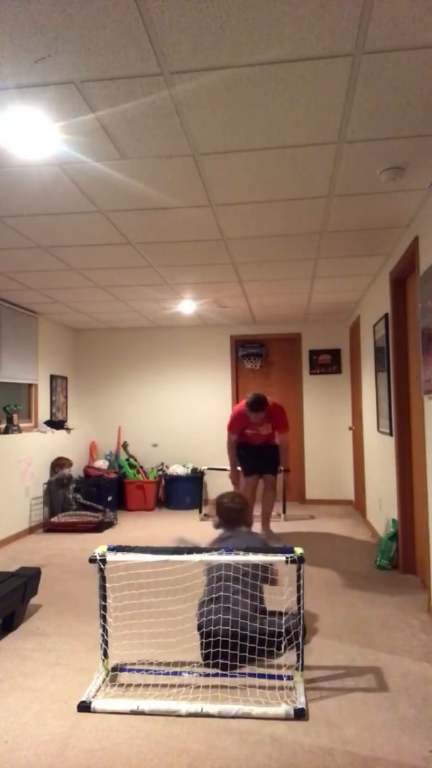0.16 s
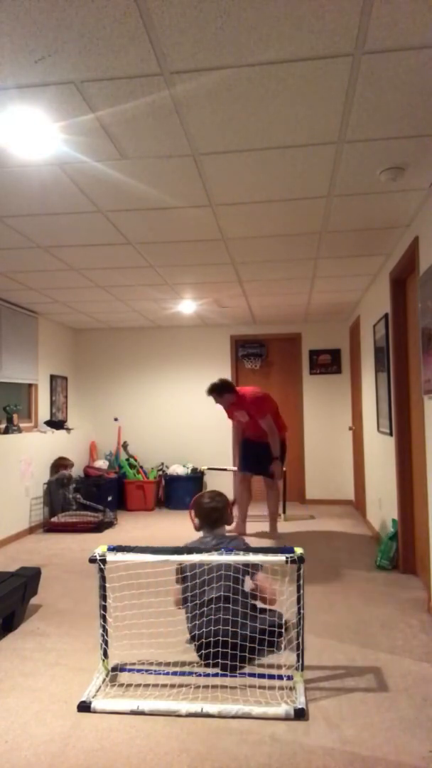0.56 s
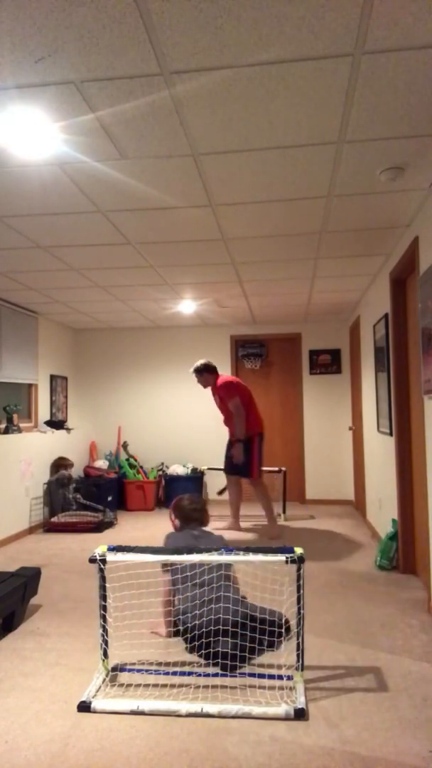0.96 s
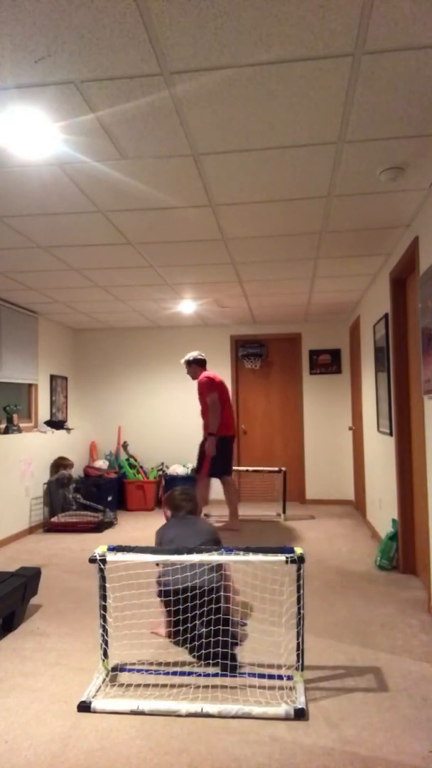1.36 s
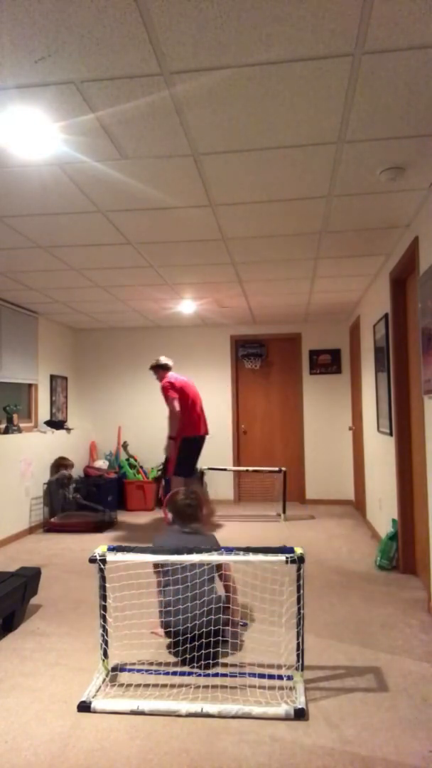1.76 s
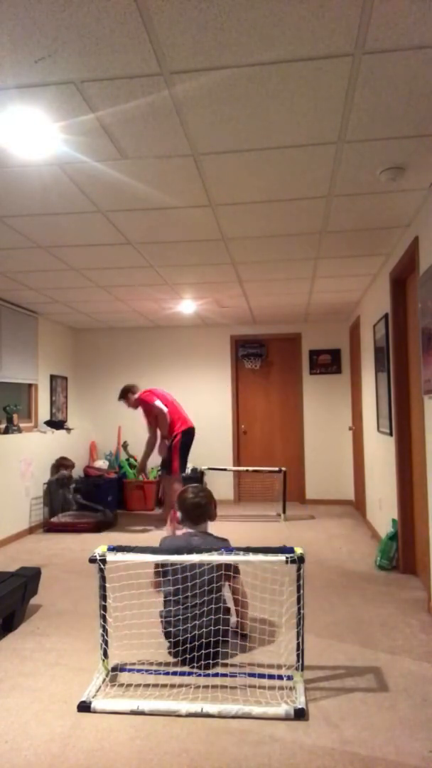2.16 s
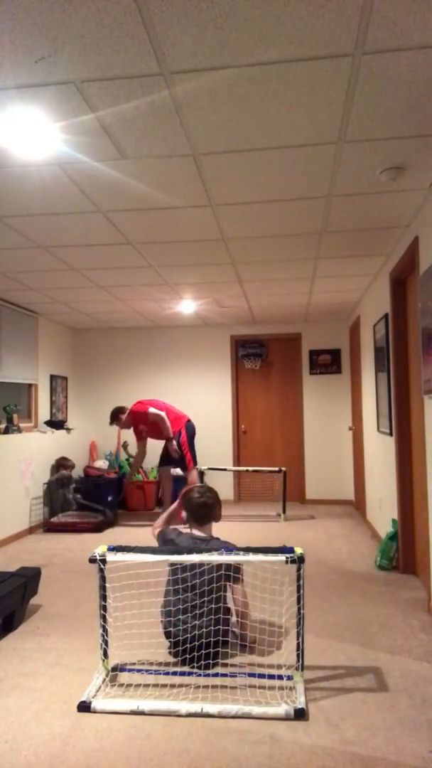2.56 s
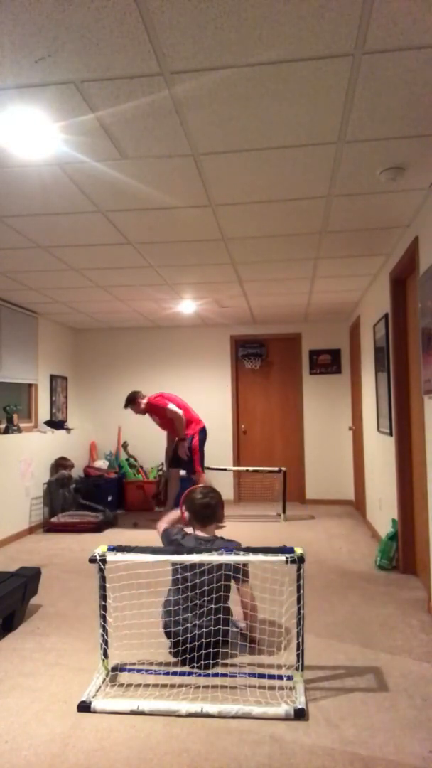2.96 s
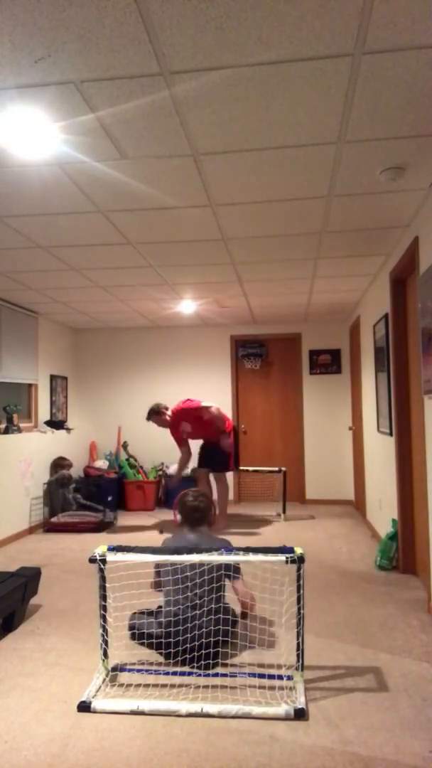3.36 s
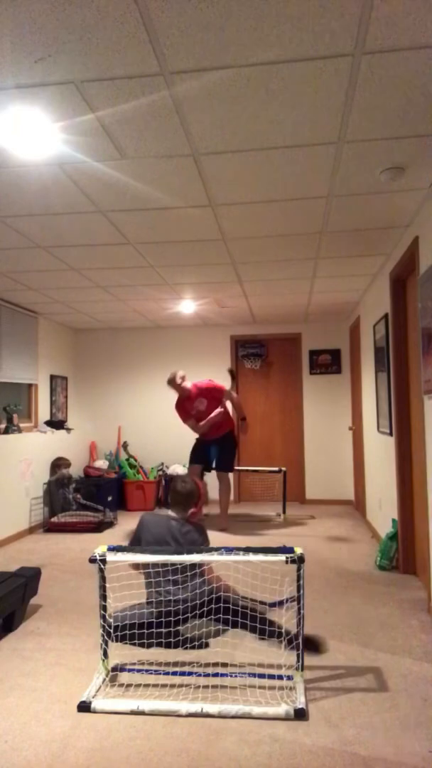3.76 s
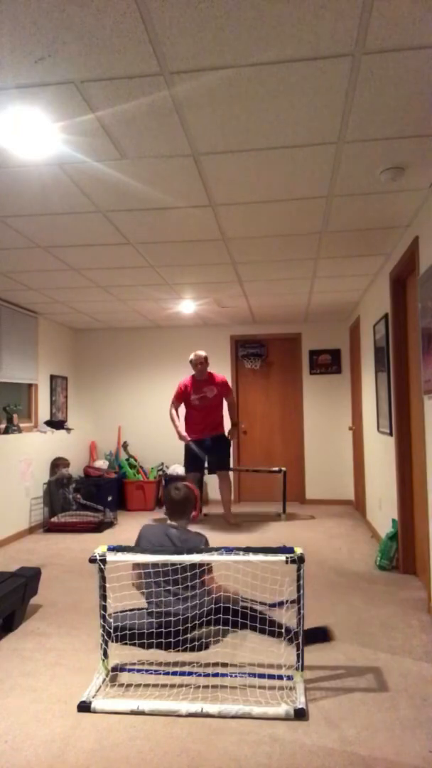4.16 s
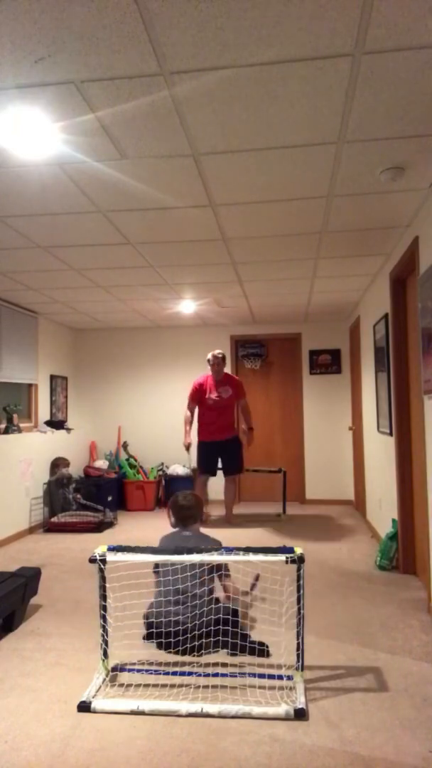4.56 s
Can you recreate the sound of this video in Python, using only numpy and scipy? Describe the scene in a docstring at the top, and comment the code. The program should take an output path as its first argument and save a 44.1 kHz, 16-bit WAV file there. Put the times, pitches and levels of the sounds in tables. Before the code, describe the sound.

Over a low furnace hum, a small knock, a dull knee thud, then a loud burst of plastic clacks and scuffing on carpet.

```python
"""A furnace hums low in a long carpeted basement room, from wavering tones, rumble and narrow duct noise.
Over a shifting background of rustle and hiss, legs in cloth slide on the carpet: noise that swells and fades.
Short plastic sticks and a ball knock on each other and on the floor, and a knee thuds down: a noise crack
over struck modes. Loose metal bits rattle once as high ringing ticks. Faint hiss lies under it all."""
import sys
import numpy as np
from scipy import signal
from scipy.fft import rfft, irfft
from scipy.io import wavfile
from scipy.ndimage import uniform_filter1d

SR = 44100
rng = np.random.default_rng(int(sys.argv[2]) if len(sys.argv) > 2 else 0)


def ratio(d):
    """dB to gain"""
    e = np.asarray(d, float) / 20
    return 10 ** e


def dump_mix(stems):
    """Bounce the given channels to the path in sys.argv[1] as a 16-bit WAV at rate SR."""
    frames = np.atleast_2d(stems).T  # one column per channel
    limited = np.clip(frames, -1, 1)  # hard clip at full scale
    pcm = np.round(limited * 32767).astype(np.int16)
    wavfile.write(sys.argv[1], SR, pcm)


N = 207314
TIME = np.arange(N) / SR  # s


def unit(x):
    """Scale to rms 1."""
    return x / np.sqrt(np.mean(x ** 2))


def coloured(x, points):
    """Shape the spectrum by (Hz, dB) points joined on a log frequency axis."""
    hz, db = np.transpose(points)
    f = np.maximum(np.arange(len(x) // 2 + 1) * SR / len(x), 1)
    gain_db = np.interp(np.log(f), np.log(hz), db, left=-90, right=-90)
    return irfft(rfft(x) * ratio(gain_db), len(x))


def noise(points):
    """Steady noise of a given colour, rms 1."""
    return unit(coloured(rng.standard_normal(N), points))


def walk(rate):
    """Random levels held 1 / rate seconds and smoothed twice; spread near 1."""
    hold = int(SR / rate)
    steps = np.repeat(rng.standard_normal(N // hold + 1), hold)
    return 1.02 * uniform_filter1d(uniform_filter1d(steps, hold), hold)[:N]


def curves(table):
    """Each column after the first as a line over time; the first holds the seconds."""
    s, *columns = np.transpose(table)
    return [np.interp(TIME, s, c) for c in columns]


def add(out, s, x):
    """Mix a sound in at a time in seconds."""
    i = int(s * SR)
    out[i:i + len(x)] += x[:N - i]


def ring(modes, t, lean_db, contact_s):
    """Struck modes of alternating sign that decay, and swell in over the contact time; peak 1."""
    hz, db, t60 = np.transpose(modes)[:, :, None]
    sign = (-1.) ** np.arange(len(modes))[:, None]
    partials = sign * ratio(db + lean_db) * np.sin(2 * np.pi * hz * t) * ratio(-60 * t / t60)
    y = np.sum(partials, axis=0) * (1 - np.exp(-t / contact_s)) ** 2
    return y / np.abs(y).max()


def room(x):
    """Direct sound plus a diffuse tail, new at each call, that builds up and dies band by band."""
    # Reverb bands. Each row: centre in Hz, relative level in dB, decay by 60 dB in seconds.
    reverb_bands = [(124, -5, 0.5), (300, 4.5, 0.42), (633, 0.5, 0.29), (1480, 5.5, 0.19),
                    (3480, 4.5, 0.25), (7100, -0.5, 0.28), (12600, 6, 0.16)]
    gap_s, build_s = 0.00085, 0.0006
    t = np.arange(SR // 2) / SR
    tail = 0
    for hz, db, t60 in reverb_bands:
        shape = [(hz / 2.2, -30), (hz / 1.5, -3), (hz * 1.5, -3), (hz * 2.2, -30)]
        band = coloured(rng.standard_normal(len(t)), shape)
        tail = tail + band * ratio(db - 60 * t / t60) / np.sqrt(t60 * SR)
    # the near walls and low ceiling answer first and strongest
    tail = tail * (1 + ratio(5.5) * np.exp(-t / 0.0021))
    tail = ratio(10.5) * tail * (1 - np.exp(-np.maximum(t - gap_s, 0) / build_s))
    tail[0] = 1  # direct sound
    return signal.fftconvolve(x, tail)


def hiss():
    """Faint steady hiss: coloured noise."""
    # Colour of the hiss. Each row: frequency in Hz, relative level in dB per Hz.
    hiss_colour = [(880, -31), (1500, 1.5), (1700, -8), (2580, 0), (2820, -11), (3200, -9), (4180, -6.5),
                   (7260, -14.5), (8490, -9.5), (13600, -11.5), (15800, -12)]
    return ratio(-75) * noise(hiss_colour)


def furnace():
    """A wavering blower hum with a mains line, over rumble that swells in a few duct resonances."""
    # Level of the low hum and rumble over time. Each row: time in seconds, level in dB.
    low_level = [(0, -48), (1.3, -47.5), (2.25, -48.5), (2.45, -50.5), (3.9, -50.5), (4.4, -50),
                 (4.7, -47.5)]
    # Colour of the rumble. Each row: frequency in Hz, relative level in dB per Hz.
    rumble_colour = [(15, -59), (25, -27), (29, -26), (36, -1.5), (59, -0.5), (81, -4), (124, -14),
                     (147, -13), (212, -6), (331, -15.5), (612, -26.5), (802, -35), (1130, -36),
                     (1300, -46), (2500, -48), (3250, -74), (5500, -120)]
    # Duct resonances. Each row: centre in Hz, width in Hz, relative level in dB.
    resonances = [(87.5, 11, -2.5), (208.5, 30, 2.5), (587, 78, -16), (1110, 8.3, -21)]

    level_db, = curves(low_level)
    hum_hz = 55.5 * (1 + 0.014 * walk(6.25))
    hum_db = -1 - 0.5 * walk(4.92) + walk(15)
    hum = ratio(hum_db) * np.sin(2 * np.pi * np.cumsum(hum_hz) / SR)
    mains = ratio(-10.5 + 1.2 * walk(4.34)) * np.sin(2 * np.pi * 119.2 * TIME)

    ducts = 0
    for f, w, db in resonances:
        peak = [(f - 2 * w, -30), (f - w / 2, -3), (f, 0), (f + w / 2, -3), (f + 2 * w, -30)]
        ducts = ducts + ratio(db) * noise(peak)
    # thin the rumble out below the hum
    tilt = [(25, -28), (44, 0), (56, 3), (70, 2), (2500, 2.5)]
    broad = unit(coloured(noise(rumble_colour), tilt)) * ratio(0.8 * walk(12))
    rumble = ratio(-2.5) * broad + ratio(-8.5) * ducts
    return ratio(level_db) * (np.sqrt(2) * (hum + mains) + rumble)


def slides():
    """Cloth dragged over pile: a dull drag and the hiss of many fibres letting go, unevenly."""
    # Background rustle and hiss, its level changing over time. Each row: time in seconds, then the levels of
    # the drag, fibre and sizzle layers in dB.
    background = [(0, -71.5, -74, -77.5), (1.4, -70.5, -70, -78), (1.6, -72, -75.5, -80),
                  (2.35, -70.5, -73.5, -79), (2.5, -69.5, -74, -88.5), (4, -68.5, -75, -82.5),
                  (4.7, -68, -68, -69.5)]
    # Slides on carpet. Each row: peak time, rise and fall in seconds, drag level in dB, brightness in dB.
    strokes = [(.307, 0.0037, 0.032, -53.5, 3), (.5, 0.073, 0.066, -68.5, -3),
               (1.2, 0.15, 0.18, -67.5, -0.5), (1.42, 0.098, .07, -66, 2), (1.95, 0.13, .05, -71, 2),
               (2.32, 0.089, 0.17, -69, 0), (3.141, 0.037, 0.055, -62, 2), (3.29, 0.035, 0.041, -57.5, 1),
               (3.45, 0.046, 0.16, -53.5, -1.5), (3.72, .12, 0.099, -56, -2), (4.21, 0.074, 0.094, -57, -2),
               (4.4, 0.025, 0.052, -70, -2), (4.535, 0.012, 0.068, -69, 9)]
    # Colours of the three layers. Each row: frequency in Hz, relative level in dB per Hz.
    drag_colour = [(600, -10), (900, -1), (1150, 3), (1400, -0.5), (1700, -0.5), (2300, -5), (2800, -12),
                   (3600, -31)]
    fibre_colour = [(1650, -64), (2800, -2.5), (3390, -2.5), (4870, -6.5), (5660, -3), (6810, -4),
                    (10000, -19), (13000, -61), (22000, -120)]
    sizzle_colour = [(4710, -42), (8000, 0), (10400, -5), (12400, 1), (14900, -9.5), (15800, -4)]

    power = ratio(np.array(curves(background))) ** 2
    for s, rise_s, fall_s, drag_db, bright_db in strokes:
        swell = np.exp(-((TIME - s) / np.where(TIME < s, rise_s, fall_s)) ** 2)
        # a brighter slide lifts the sizzle twice as much as the fibres
        layers_db = drag_db + np.array([0, -5.5 + bright_db, -15.5 + 2 * bright_db])
        power = power + ratio(layers_db)[:, None] ** 2 * swell
    drag, fibre, sizzle = np.sqrt(power)
    catch = walk(25.38)  # unevenness shared by all three layers
    drag = drag * ratio(1.56 * catch) * noise(drag_colour)
    fibre = fibre * ratio(0.44 * catch + 0.73 * walk(68)) * noise(fibre_colour)
    sizzle = sizzle * ratio(catch) * noise(sizzle_colour)
    return drag + fibre + sizzle


def rattle():
    """Loose metal bits chafe and tick against each other for a moment and ring high."""
    # Ringing of the bits. Each row: frequency in Hz, relative level in dB, decay by 60 dB in seconds.
    metal_modes = [(6840, -1, .06), (8100, -3, .06), (8640, 1, .06), (9800, -15, 0.052), (11000, -9, .06),
                   (11700, 6, 0.053), (12240, 1, 0.055), (13700, -4, .06)]
    # Colour of the chafing. Each row: frequency in Hz, relative level in dB per Hz.
    chafe_colour = [(880, -32), (1500, -2.5), (3330, -6.5), (3860, -7), (4350, -9), (6450, 2), (12200, -6),
                    (15800, -9)]
    start_s, length_s = 0.98, 0.04

    t = np.arange(SR // 8) / SR
    swell = np.exp(-TIME / length_s) * (1 - np.exp(-TIME / 0.00043))
    out = ratio(-51.5) * noise(chafe_colour) * swell
    for when, size, detune, *spot in rng.random((24, 3 + len(metal_modes))):
        stretched = t * (1 + 0.035 * (detune - 0.5))
        spot_db = -24 * np.array(spot)[:, None]  # each tick brings out other modes
        tick = ring(metal_modes, stretched, spot_db, 0.00023)
        add(out, length_s * when ** 1.2, ratio(-56 - 5.6 * size) * tick)
    return np.roll(room(out)[:N], int(start_s * SR))


def blows():
    """Every blow cracks, rings the stick, knocks hollow and thumps the floor; clacks are hard, thuds soft."""
    # Hard contacts of stick and ball, bounces included. Each row: start in seconds, crack, stick ring and
    # hollow knock in dB, pitch the knock leans to in Hz.
    clacks = [(.3035, -33.5, -37, -39, 570), (.3085, -31.5, -42.5, -31.5, 580),
              (0.3186, -35.5, -56, -24.5, 556), (.9720, -40.5, -47.5, -34.5, 487),
              (3.4246, -45, -35, -54, 636), (3.4320, -19.5, -14.5, -18.5, 640),
              (3.4346, -10.5, -18.5, -23, 650), (3.4420, -20, -24, -21.5, 660),
              (3.4480, -33, -25, -23, 353), (3.5428, -30, -18.5, -33, 300),
              (3.5480, -25.5, -29, -30.5, 627), (3.5586, -44, -39, -34, 650),
              (3.5680, -31, -40, -30.5, 666), (3.609, -55, -61, -42, 620), (4.0, -53, -62, -68, 600),
              (4.4430, -54, -47, -36, 534), (4.5200, -45, -58, -56, 300)]
    # Soft falls of knee, foot and ball on the carpet. Each row: start in seconds, hollow knock and floor
    # thump in dB, pitch the knock leans to in Hz.
    thuds = [(.775, -39, -47, 403), (.986, -37, -63, 423), (1.3406, -27, -18.5, 410),
             (1.365, -32.5, -45, 380), (1.391, -32, -38, 407), (1.462, -37.5, -57, 417),
             (1.981, -53, -46, 300), (4.363, -46, -62, 470), (4.453, -35, -44, 420),
             (4.478, -41.5, -46, 383)]
    # What rings when struck. Each row: frequency in Hz, relative level in dB, decay by 60 dB in seconds.
    stick_modes = [(780, 4.5, 0.0079), (915, 1.5, 0.025), (1055, -2.5, 0.04), (1266, 2, 0.023),
                   (1477, 2, 0.0094), (1690, -1.5, 0.021), (2450, -12.5, 0.033)]
    hollow_modes = [(202.7, 7, 0.088), (260, 5.5, 0.16), (300, 2, 0.12), (355.8, -1, 0.079),
                    (419.5, 0, 0.068), (488, -6, 0.08), (570, -0.5, 0.068), (629, -9.5, 0.17),
                    (724, -7.5, 0.056)]
    floor_modes = [(104.5, 2.5, 0.06), (146, 7.5, 0.087), (180.6, -5.5, 0.11)]
    # Colour of the crack. Each row: frequency in Hz, relative level in dB per Hz.
    crack_colour = [(1500, -17), (2200, -6.5), (2900, -8.5), (3800, -2), (4900, -11), (6200, -2.5),
                    (8000, -13.5), (10500, -19), (12500, -16.5), (15800, -23), (16400, -42)]

    # a clack thumps 18 dB under its knock; a thud cracks 26 dB and rings the stick 23 dB under its knock
    rows = [(s, crack, stick, knock, knock - 18, hz) for s, crack, stick, knock, hz in clacks]
    rows += [(s, knock - 26, knock - 23, knock, thump, hz) for s, knock, thump, hz in thuds]

    out = np.zeros(N)
    t = np.arange(SR // 4) / SR
    early = t[:1024]
    burst = np.exp(-early / 0.001) * (1 - np.exp(-early / 0.0002))
    hollow_hz = np.array(hollow_modes)[:, :1]
    for s, crack_db, stick_db, hollow_db, thump_db, lean_hz in rows:
        crack = coloured(rng.standard_normal(1024), crack_colour) * burst
        # a dull blow is a soft one: the weaker its crack, the longer the contact
        contact_s = np.clip(0.0012 * ratio(0.36 * (hollow_db - crack_db)), 0.0006, 0.009)
        # the modes nearest the blow's own pitch answer most
        lean_db = -18 * np.abs(np.log2(hollow_hz / lean_hz))
        # each blow balances the stick modes a little differently
        spot_db = 1.5 * rng.standard_normal((len(stick_modes), 1))
        body = ratio(stick_db) * ring(stick_modes, t, spot_db, 0.51 * contact_s)
        body = body + ratio(hollow_db) * ring(hollow_modes, t, lean_db, contact_s)
        body = body + ratio(thump_db) * ring(floor_modes, t, 0, 0.016)
        body[:1024] += ratio(crack_db) * crack / np.abs(crack).max()
        add(out, s, room(body))
    return out


def scene():
    """Knocks and rattle in the room over slides, furnace and faint hiss, as one channel."""
    mix = hiss() + furnace() + slides() + rattle() + blows()
    return mix[None]


def low_pass(x):
    """Removes everything above the highest recorded frequency."""
    return signal.sosfilt(signal.butter(12, 16450, fs=SR, output="sos"), x)


def record(dry):
    """A phone microphone that drops the deepest bass, by a steep high-pass at 44 Hz."""
    bass_cut = signal.butter(4, 44., "high", fs=SR, output="sos")
    finished = signal.sosfilt(bass_cut, dry)
    return low_pass(finished)


dry = scene()
out = record(dry)
dump_mix(out)
```